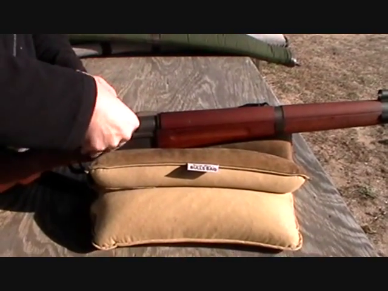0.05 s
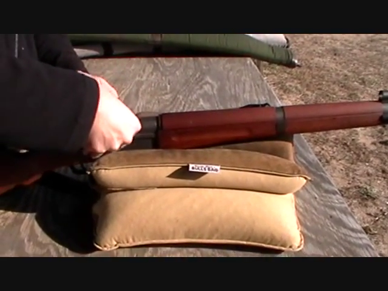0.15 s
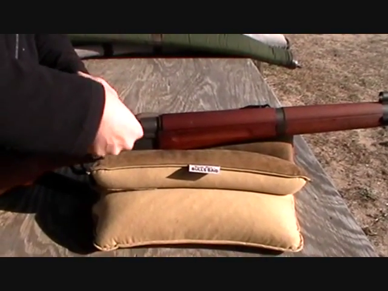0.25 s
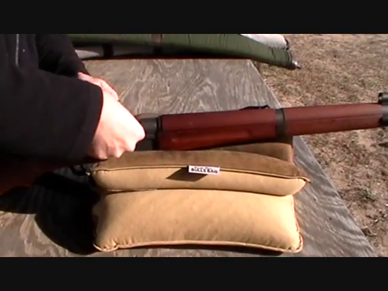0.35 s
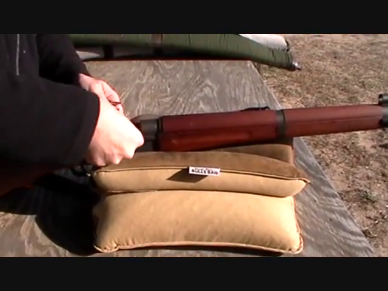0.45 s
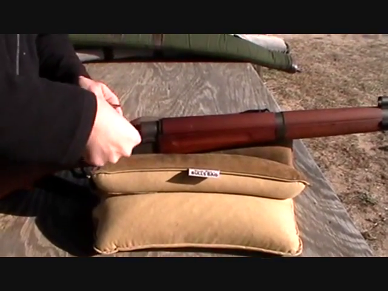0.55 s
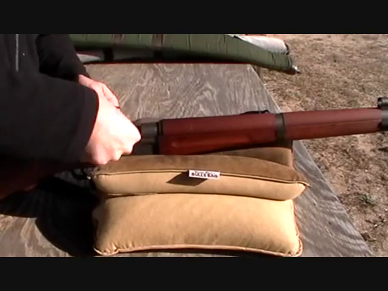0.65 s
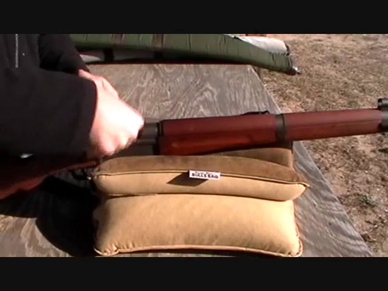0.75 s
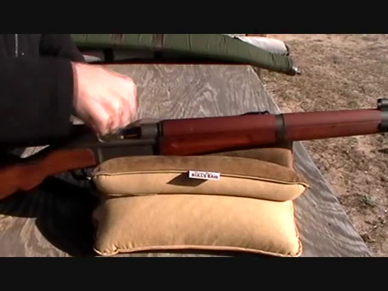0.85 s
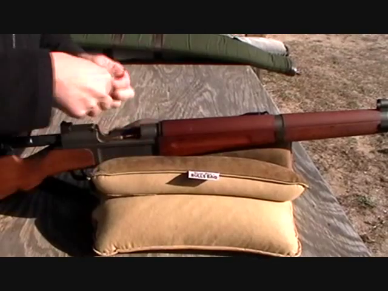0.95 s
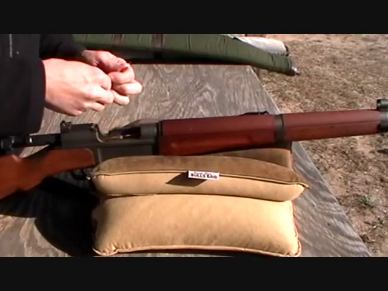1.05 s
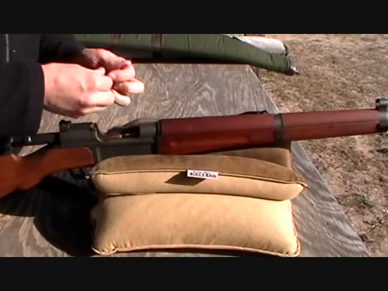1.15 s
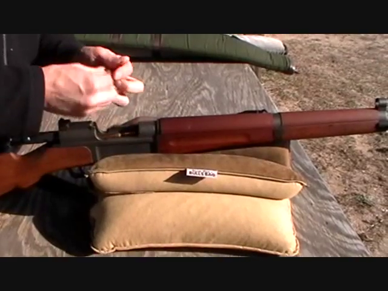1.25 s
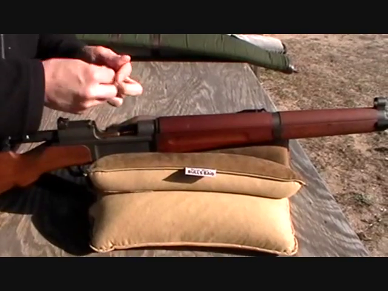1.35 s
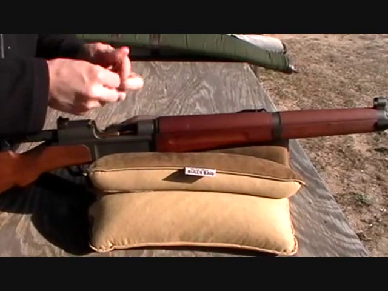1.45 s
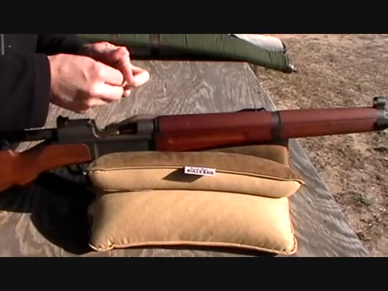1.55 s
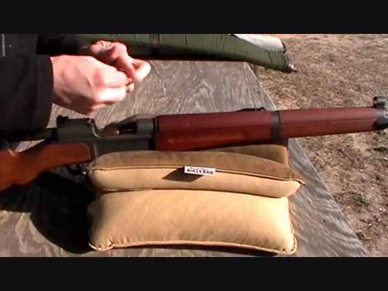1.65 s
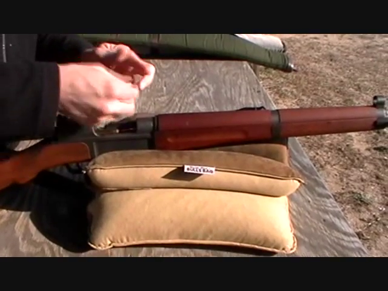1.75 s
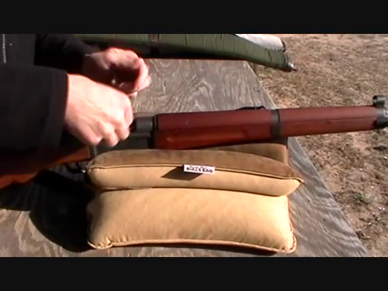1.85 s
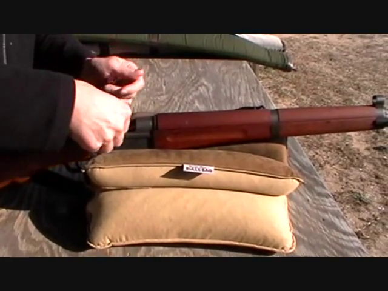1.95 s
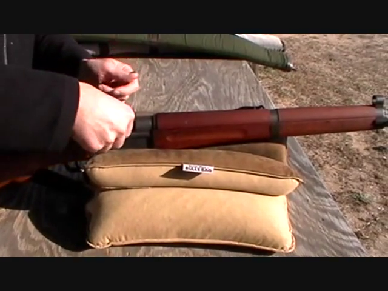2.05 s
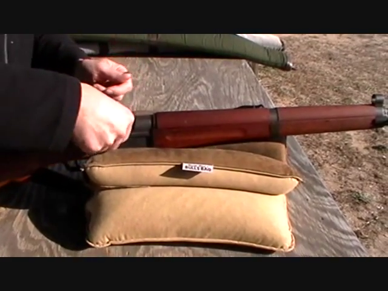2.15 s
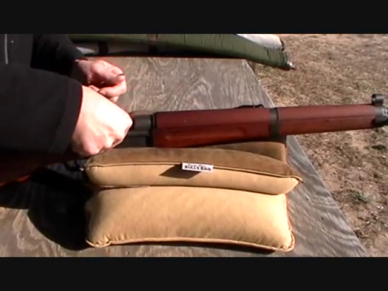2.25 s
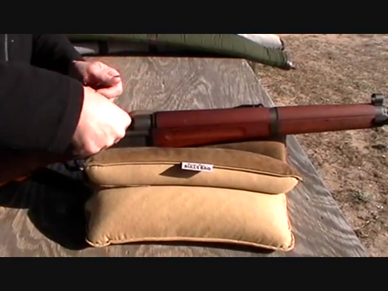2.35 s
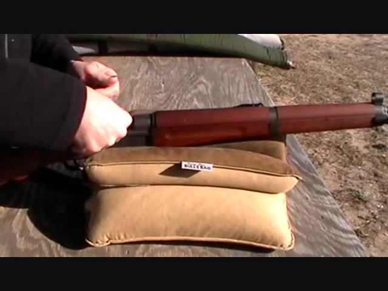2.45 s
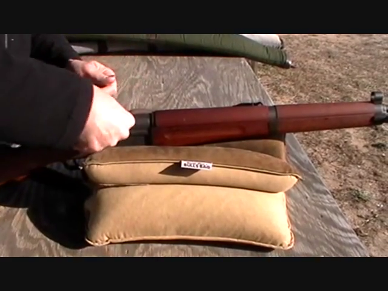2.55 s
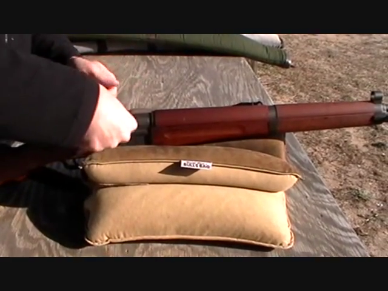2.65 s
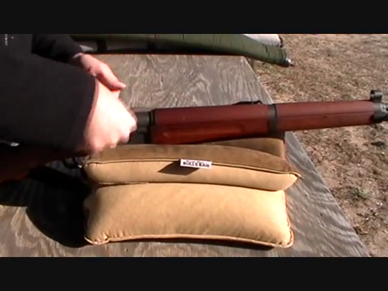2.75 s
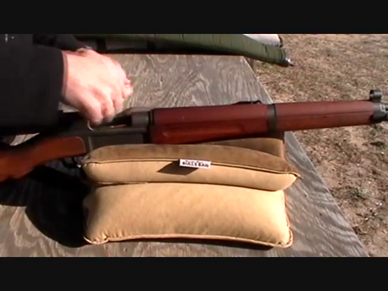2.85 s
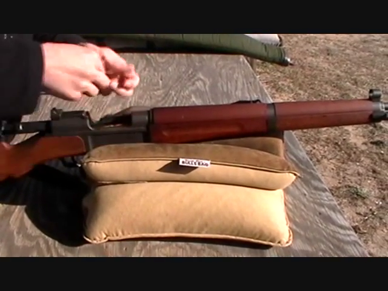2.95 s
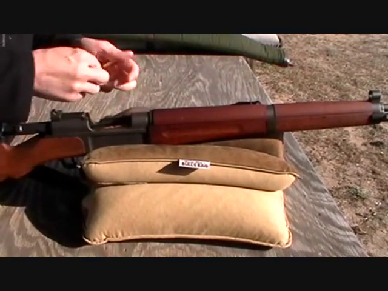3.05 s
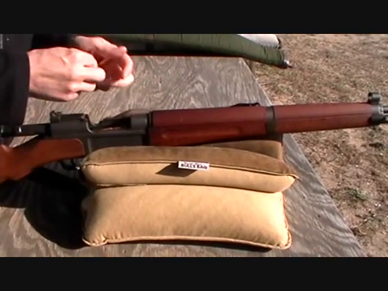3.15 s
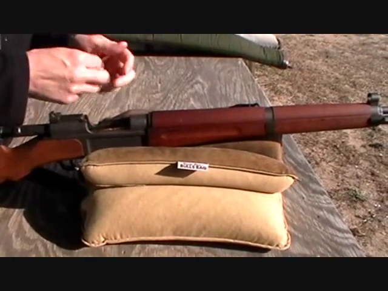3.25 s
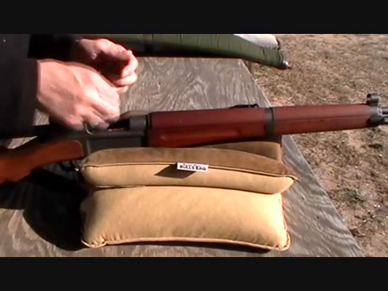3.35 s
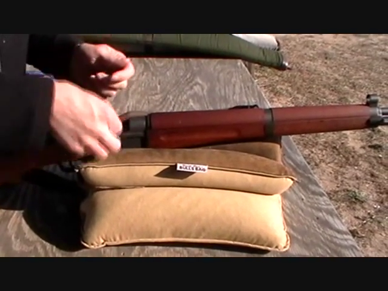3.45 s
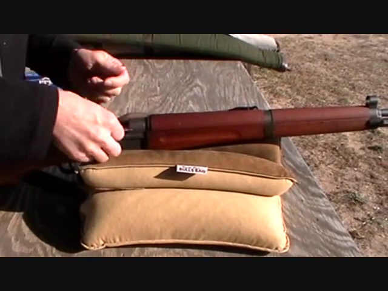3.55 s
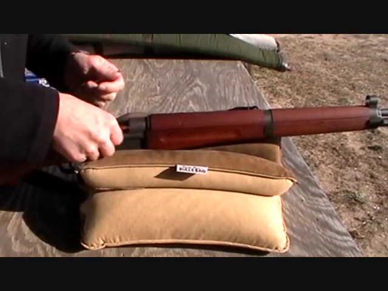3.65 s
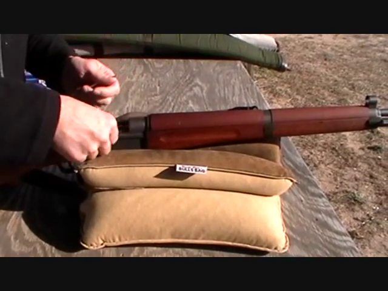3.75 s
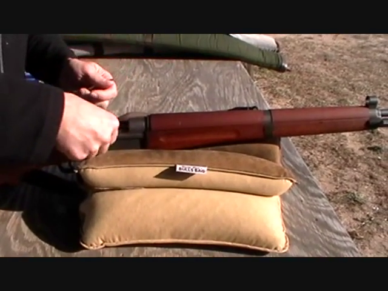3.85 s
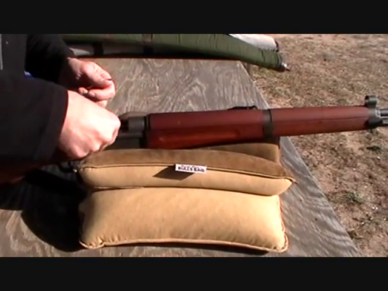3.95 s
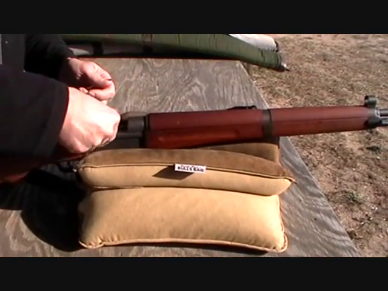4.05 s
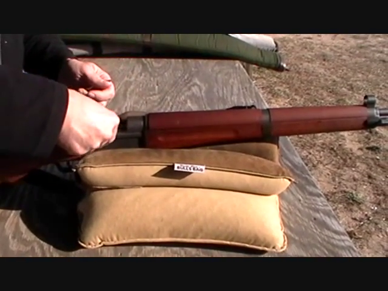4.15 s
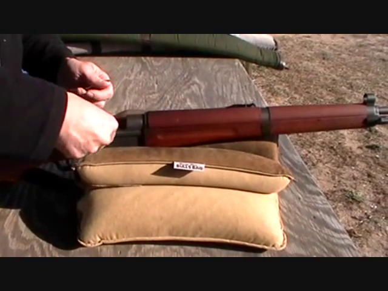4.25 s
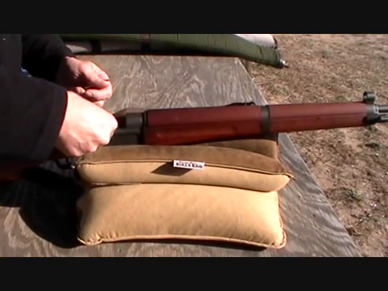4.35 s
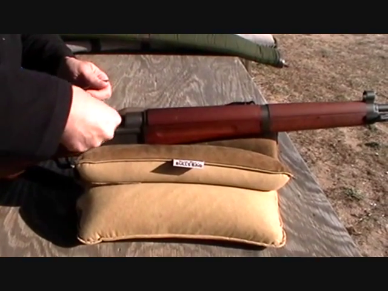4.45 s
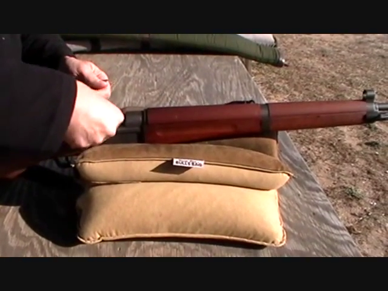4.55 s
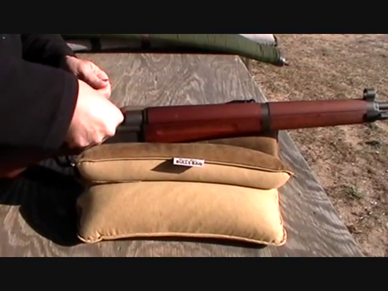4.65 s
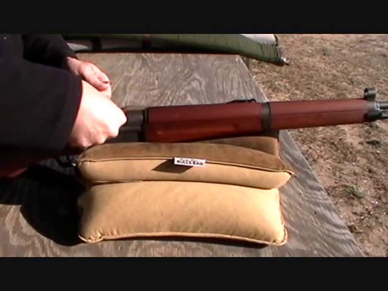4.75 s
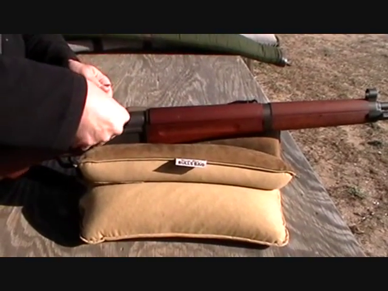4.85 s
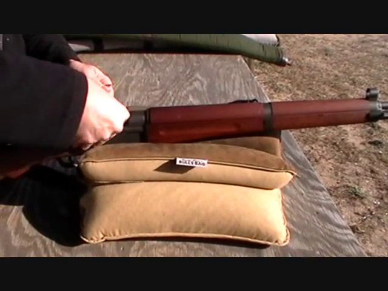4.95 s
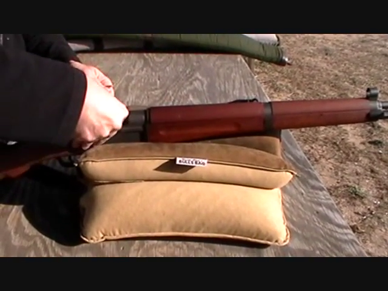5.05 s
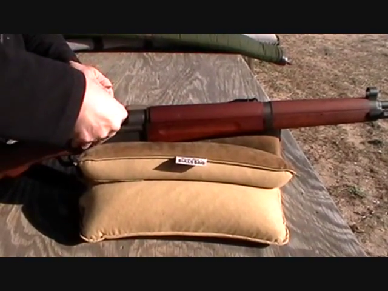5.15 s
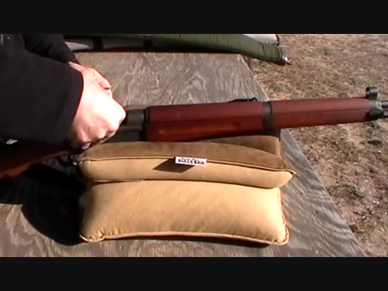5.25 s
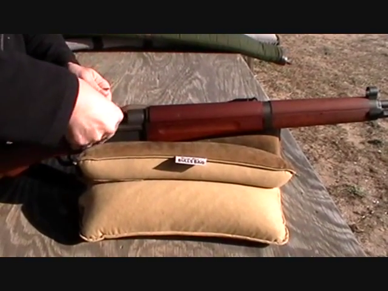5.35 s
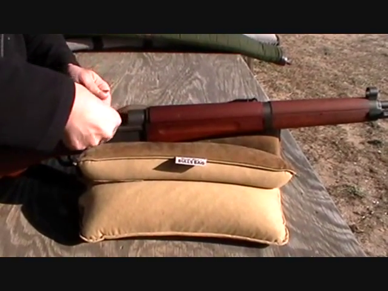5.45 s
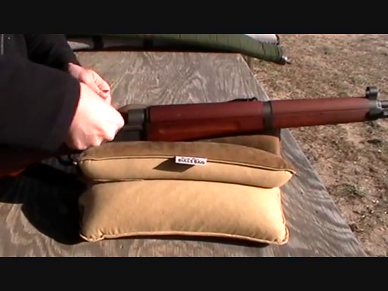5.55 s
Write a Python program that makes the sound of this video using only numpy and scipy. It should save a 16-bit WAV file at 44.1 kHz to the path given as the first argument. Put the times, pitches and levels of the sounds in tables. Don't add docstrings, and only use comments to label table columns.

```python
import sys
import numpy as np
from scipy import signal
from scipy.fft import rfft, irfft, next_fast_len
from scipy.io import wavfile
from scipy.ndimage import uniform_filter1d, map_coordinates

SR = 44100
rng = np.random.default_rng(int(sys.argv[2]) if len(sys.argv) > 2 else 0)


def convert_level_to_amplitude(level_db):
    exponent = np.asarray(level_db, float) / 20
    return 10 ** exponent


def pcm_store(signal):
    levels = np.round(np.clip(np.atleast_2d(signal), -1, 1) * 32767)
    wavfile.write(sys.argv[1], SR, levels.astype(np.int16).T)


N = 247401


def unit(x):
    return x / np.sqrt(np.mean(x ** 2) + 1e-20)


def along(points, hz):
    f, v = np.transpose(points)
    return np.interp(np.log(hz + 1), np.log(f + 1), v)


def wobble(rate):
    knots = rng.standard_normal(int(N * rate / SR) + 4)
    return map_coordinates(knots, [np.arange(N) * rate / SR])


def filtered(x, response):
    m = next_fast_len(N + SR // 2)
    return irfft(rfft(x, m) * response(np.fft.rfftfreq(m, 1 / SR)), m)[..., :N]


def body(modes):
    def response(f):
        total = 0
        for k, (centre, width, db) in enumerate(modes):
            resonance = 1j * f * width / (centre ** 2 - f ** 2 + 1j * f * width)
            total = total + (-1) ** k * convert_level_to_amplitude(db) * resonance
        return total / np.sqrt(np.mean(abs(total) ** 2))
    return response


def rush(spectrum, patchy_db):
    # f/Hz, likeness (1 = the same)
    alike = [(60, 0.92), (180, 0.93), (550, 0.85), (1650, 0.87), (4970, 0.13), (15000, 0.37)]
    z = signal.stft(rng.standard_normal((2, N + 512)), nperseg=512)[2]
    patches = uniform_filter1d(rng.standard_normal(z.shape[1:]), 3, 0)
    patches = uniform_filter1d(patches, 14, 1)
    pair = signal.istft(z * convert_level_to_amplitude(patchy_db * unit(patches)), nperseg=512)[1][:, :N]

    def response(hz):
        inside = (hz > spectrum[0][0]) * (hz < spectrum[-1][0])
        turn = np.arccos(np.clip(along(alike, hz), -1, 1)) / 2
        return convert_level_to_amplitude(along(spectrum, hz)) * inside * [np.cos(turn), np.sin(turn)]

    mid, side = filtered(pair, response)
    return unit(np.array([mid + side, mid - side]))


def outdoors():
    # t/s, level/dB
    traffic = [(0, -59), (.17, -56.5), (1.34, -56), (1.92, -53), (2.16, -50), (2.4, -50.5), (2.92, -49.5),
               (3.3, -52), (3.55, -51), (3.75, -47.5), (4.01, -50.5), (4.27, -51), (5.08, -51), (5.41, -50),
               (5.61, -45.5)]
    # f/Hz, level/dB per Hz
    rumble_colour = [(15, -50.5), (25, -26.5), (59, -7.5), (139, 1), (173, -6.5), (382, -7.5), (616, -13),
                     (650, -7.5), (840, -36.5), (1430, -120)]
    road_colour = [(380, -43), (650, -14.5), (747, -3), (869, -4.5), (1010, -4.5), (1200, -8), (1560, -37),
                   (2640, -120)]
    tyre_colour = [(760, -32.5), (1300, -3.5), (1550, -0.5), (1680, -2), (1840, -5.5), (1980, -10.5),
                   (2260, -8), (2670, -14), (3180, -31), (3600, -28.5), (4680, -56), (7920, -120)]
    hiss_colour = [(1500, -14), (3000, 8.5), (5000, -0.5), (8000, -6), (12000, -6), (15800, -13)]
    road_db = np.interp(np.arange(N) / SR, *np.transpose(traffic))
    swing_db = road_db - road_db.mean()
    rumble = convert_level_to_amplitude(-54 + 0.14 * swing_db + 0.8 * wobble(6)) * rush(rumble_colour, patchy_db=0.7)
    road = convert_level_to_amplitude(road_db + 0.46 * wobble(3.6)) * rush(road_colour, patchy_db=2.5)
    tyres = convert_level_to_amplitude(-52 + 0.28 * swing_db + 0.9 * wobble(1.8)) * rush(tyre_colour, patchy_db=1.5)
    hiss = convert_level_to_amplitude(-66) * rush(hiss_colour, patchy_db=1.1)
    return rumble + road + tyres + hiss


def fingers(grain_db=2, still_db=-73):
    # middle t/s, level/dB, time to fade 6 dB on each side/s
    strokes = [(.33, -63.5, 0.19), (.435, -58, 0.07), (.58, -63.5, 0.2), (.701, -55, 0.0238),
               (.86, -64, 0.1), (1, -66.5, 0.15), (1.13, -68, 0.17), (1.375, -64, .015), (1.445, -68, .04),
               (1.871, -66, .05), (2.24, -62.5, 0.1), (2.39, -61, 0.0066), (2.81, -62, 0.0154),
               (2.9, -65.5, .05), (3.32, -74, 0.13), (3.79, -57.5, 0.0387), (3.94, -62, 0.1033),
               (4.74, -64, 0.17), (5.38, -69, .15), (5.51, -50, .06), (3.73, -57, .06), (2.075, -50, .03),
               (.15, -44, .03), (4.33, -58, .05)]
    # f/Hz, level/dB per Hz
    cloth = [(1500, -25.5), (3000, -6), (5500, -3.5), (9000, -10), (13000, -19), (15800, -20)]
    t = np.arange(N) / SR
    swells_db = [np.maximum(db - 6 * abs(t - s) / fade_s, still_db) for s, db, fade_s in strokes]
    grains = unit(rng.standard_normal(N) * convert_level_to_amplitude(grain_db * wobble(400)))
    rub = unit(filtered(grains, lambda hz: convert_level_to_amplitude(along(cloth, hz))))
    return convert_level_to_amplitude(np.max(swells_db, axis=0)) * rub


def strikes(t, spiky_db=3, lose_db=11, chatter_db=-17, chatter_s=0.015, blow=10):
    # t/s, brass level/dB, receiver level/dB re brass, lips level/dB re brass
    thuds = [
        (0.065, -64.5, -6, 5),
        (1.9159, -61, -10, -4),
        (2.7426, -76, 4, -13.5),
        (2.8209, -46, 9, -0.5),
        (2.932, -68.5, -7.5, 10.5),
        (4.293, -39, 0, 0),
        (4.9474, -41, 6, -8),
        (4.9587, -70, 6.5, -9.5),
    ]
    springs = [(0.1165, -11, -5, -5), (0.118, -5, -8, -4), (0.1745, -39, -1.5, -4), (2.1343, -17, -8, -5),
               (2.4883, -20, -6, -8), (2.4992, -8, -2, -3), (2.5141, -9, -1, -2), (3.8548, -16, -4, -10),
               (3.8242, -25, -1, -20), (4.4626, -28, 0, -6), (5.4098, -10, -3, -4), (5.4298, -5.5, -1, -5)]
    snaps = [(2.123, -17, -2, -1), (3.6484, -23, -4, 0), (3.6562, -29, -6, -8), (3.8481, -22, -4, -10.5),
             (3.8589, -15, -3, -2), (4.2863, -19, 1, -9), (4.4712, -16, -7, 0), (4.4726, -17, -7, 1),
             (4.4738, -17, -7, 0), (4.4752, -17, -6, -2), (4.4842, -11.5, -8, -5), (4.4858, -14, -8, 0),
             (4.4884, -15, 0, -3), (4.4897, -11, -4, 0), (4.4935, -19, -2, -6), (4.5212, -30, -3, -6),
             (4.5349, -28, 0, -14), (2.5167, -13, -2, -2), (2.52, -17, 2, -6), (2.5235, -20, -2, -5),
             (2.53, -23, 0, -5), (2.534, -24, 0, -5), (3.8415, -33, -4, -3), (3.8569, -19, -2, -10),
             (3.8645, -20, 0, -8), (0.1213, -18, -3, -4), (0.1243, -16, -3, -5), (4.9499, -38, -8, -12),
             (5.4268, -13, 0, 0), (5.437, -22, -2, 0), (5.4435, -24, -2, 0), (5.449, -25, -2, 0),
             (5.465, -33, 0, -4), (5.488, -39, 0, -4), (.8605, -40, 0, 0), (.866, -42, 0, 0),
             (3.6115, -31, 0, 0), (3.622, -37, 0, 0), (5.4334, -15, 0, 1.5), (5.5095, -45, 2, -3)]
    rattles = [
        (0.1232, -20, 0, -3),
        (0.22, -50, 2, -3),
        (0.1329, -30, -6.5, 3),
        (1.5438, -34.5, 1.5, 2),
        (1.5443, -46, -12, -7),
        (3.6684, -39.5, -1.5, -9),
        (3.6893, -44.5, -3, -17),
        (4.5328, -36, -0.5, -6),
        (4.6124, -38, -5, -14),
        (5.4228, -23, 2.5, 4.5),
    ]
    ticks = [(0.32, -57.5, 2.5, -4), (0.3453, -66, 16.5, -0.5), (0.5393, -50, 0, 3), (2.3004, -61, 1, 7.5),
             (2.3968, -53.5, 3.2, 1), (2.8169, -53.5, 8.5, -9), (3.9491, -47.5, 8, -4),
             (4.2201, -45, 5, -12), (4.2352, -41, 5, -15), (4.2749, -56, 8, -22), (4.7352, -65, 15, -7),
             (4.8913, -48.5, 3.2, -27.5), (5.1911, -59, 16.74, -14)]
    clinks = [(0.7995, -54, -1, -28), (0.8056, -49.5, -5.5, -13), (0.9426, -47, -5.5, 1.5),
              (1.0014, -57, -15, -3), (1.1276, -58.5, -8, -1.5), (1.2605, -51, -14.5, -18.5),
              (1.3374, -54, -20.5, -6.5), (1.43, -48, -6, -3), (1.4451, -44, -24, -16),
              (1.6526, -29, -12, -1), (1.6575, -34, -12, 4.5), (1.6633, -40, -26, -9.5),
              (1.8603, -57.5, -4.5, -1.5), (1.8723, -59.5, -18.5, 0), (3.2063, -49.5, -9, -21.5),
              (3.2245, -62, -7, -1), (3.2449, -63, -13.5, -5), (3.368, -46.5, -30, -1.5),
              (3.3834, -70, -15.5, -5), (3.7647, -45, -12.5, -16.5), (3.7771, -50, -8, -11),
              (3.8031, -48, -25.5, -19)]
    knocks = [
        (0.851, -24, 0, -2),
        (2.0255, -30, 3, -16),
        (2.0483, -24, 3, -8),
        (2.0891, -40.5, 3, -8),
        (2.1316, -20, -1, -5),
        (2.1385, -25.5, 1.5, -5),
        (3.6062, -24, 0, 3),
        (3.6152, -34, 4, 1),
        (4.6187, -37.5, 4.5, -26),
        (5.4272, -20, 0, 2),
    ]
    # contacts, stock level/dB re brass, rattle length/ms
    kinds = [(springs, -16, 2.1), (snaps, -5.5, 1.8), (knocks, 0.6, 2.6), (thuds, 10.5, 2.4),
             (rattles, -3.4, 4.8), (clinks, -17.5, 1.7), (ticks, -0.6, 2.4)]
    force = np.zeros((4, N + len(t)))
    spike_db = spiky_db * np.repeat(rng.standard_normal(N // 10 + len(t)), 10)[:N + len(t)]
    grit = rng.standard_normal(N + len(t)) * convert_level_to_amplitude(spike_db)
    for rows, stock_db, ms in kinds:
        fade = convert_level_to_amplitude(-lose_db * t / (ms / 1000)) + convert_level_to_amplitude(chatter_db - 60 * t / chatter_s)
        for s, db, receiver_db, lips_db in rows:
            start = round(s * SR)
            rattle = np.append(blow, grit[start * 37 % N:][:len(t) - 1]) * fade
            rattle *= np.linalg.norm(fade) / np.linalg.norm(rattle)
            levels_db = db + np.array([0, receiver_db, lips_db, stock_db])
            force[:, start:][:, :len(t)] += convert_level_to_amplitude(levels_db)[:, None] * rattle
    return force


def slides(t):
    # start t/s, end t/s, start level/dB, end level/dB, stock level/dB re scrape
    drags = [
        (0.095, 0.121, -46, -28, 2.5),
        (2.459, 2.489, -63, -38.5, -2),
        (2.485, 2.515, -34, -36, -2),
        (3.842, 3.848, -41, -42, -9.5),
        (4.213, 4.24, -62, -47.5, 8.5),
        (4.4685, 4.486, -30, -27, -4),
        (5.385, 5.411, -70, -35, 9),
        (5.415, 5.427, -20.5, -27, -4.5),
    ]
    force = np.zeros((4, N + len(t)))
    for start, end, start_db, end_db, stock_db in drags:
        level_db = np.interp(t, [0, end - start], [start_db, end_db])
        scrape = rng.standard_normal(len(t)) * convert_level_to_amplitude(level_db) * (t < end - start)
        force[:, round(start * SR):][:, :len(t)] += convert_level_to_amplitude([[-2.5], [0.5], [-5], [stock_db]]) * scrape
    return force


def contacts(dull_hz=11100):
    # f/Hz, width/Hz, level/dB
    brass_modes = [(4850, 250, -4), (5280, 150, 0), (5900, 350, -4), (6550, 260, -2), (7100, 400, -7)]
    receiver_modes = [(2850, 300, -5), (3280, 220, -2), (3700, 300, -6), (4350, 250, -6)]
    lip_modes = [(7540, 500, 3), (8904, 580, 0.5), (9800, 600, -0.5), (10830, 470, 1.5), (11900, 1200, -8),
                 (14300, 2600, -15)]
    stock_modes = [(419.2, 42, -16.5), (810.2, 67, -3), (1285, 330, -6.5), (1470, 225, -1), (1735, 300, -2),
                   (2360, 310, -4.5)]
    t = np.arange(SR // 20) / SR
    force = (strikes(t) + slides(t))[:, :N]
    brass = convert_level_to_amplitude(1.2) * filtered(force[0], body(brass_modes))
    receiver = convert_level_to_amplitude(0.5) * filtered(force[1], body(receiver_modes))
    lips = convert_level_to_amplitude(0.3) * filtered(force[2], body(lip_modes))
    stock = convert_level_to_amplitude(0.5) * filtered(force[3], body(stock_modes))

    def dull(hz):
        return 1 / (1 + 1j * hz / dull_hz / 0.7 - (hz / dull_hz) ** 2)

    return lips + filtered(brass + receiver + stock, dull)


def rings(waver=0.6, flutter_db=4, twin_ratio=1.022, twin_db=-6):
    pitch = dict(butt=420, stock=812, palm=2430, bolt=3290, body=5260, case=5400, spring=7800, throat=2880, ramp=4050, rim=6620, bag=330, grip=1650, edge=12500, wall=4950, rail=7250, neck=9950, lip=10950)
    # t/s, mode name, level/dB, time to fall 60 dB/s
    pings = [(2.0256, "wall", -24, .015), (2.0256, "throat", -22, .012), (2.0256, "rail", -36, .01),
             (2.0484, "wall", -18, .03), (2.0484, "rail", -19, .012), (2.0484, "neck", -31, .012),
             (2.058, "wall", -38, .06), (2.0484, "palm", -27, .03), (2.058, "palm", -38, .06),
             (.118, "wall", -14, .02), (.135, "wall", -27, .09), (.8513, "bolt", -19, .01),
             (3.6486, "grip", -25, .03), (3.6486, "ramp", -25, .012), (3.8243, "grip", -25, .02),
             (3.8243, "throat", -23, .012), (3.735, "body", -52, .2), (2.0257, "grip", -26, .015),
             (4.535, "grip", -25, .03), (4.535, "stock", -32, .04), (4.2864, "neck", -33, .01),
             (.124, "ramp", -19, .02), (.1, "throat", -34, .08), (2.1232, "spring", -14, .012),
             (2.1234, "rail", -14, .012), (2.1234, "ramp", -20, .015), (2.1232, "neck", -21, .012),
             (2.134, "wall", -19, .03), (2.4884, "bolt", -17, .015), (2.4884, "rim", -19, .012),
             (2.4884, "lip", -24, .01), (3.6486, "spring", -24, .02), (3.6486, "neck", -22, .012),
             (3.8591, "neck", -16, .015), (3.8591, "spring", -18, .012), (4.2864, "lip", -20, .012),
             (4.2864, "rim", -20, .012), (4.2864, "throat", -11, .014), (4.2866, "grip", -22, .015),
             (4.2866, "palm", -22, .012), (4.2866, "rail", -22, .012), (4.289, "ramp", -26, .04),
             (4.301, "neck", -52, .04), (.8512, "lip", -32, .01), (.8512, "rim", -30, .01),
             (.118, "neck", -15, .012), (.118, "palm", -14, .015)]
    brass_rings = [(0.54, "body", -43.5, .03), (0.8053, "case", -52, .07), (1.5429, "case", -32.5, 0.052),
                   (1.55, "case", -59, .2), (1.544, "neck", -32.5, 0.039), (1.6527, "neck", -32, 0.03),
                   (1.6577, "neck", -33, 0.04), (1.6581, "neck", -55, 0.22), (1.6578, "case", -32, 0.0335),
                   (1.6643, "case", -36, 0.022), (1.6563, "palm", -38.5, 0.076), (2.82, "body", -44, 0.03),
                   (3.368, "body", -32, 0.0111), (3.378, "body", -65, 0.07), (3.6486, "body", -13, 0.025),
                   (3.6487, "body", -32, 0.18), (3.8043, "body", -56, 0.082), (3.8242, "body", -11, 0.018),
                   (3.834, "body", -30.5, 0.16), (3.8548, "body", -9, 0.025), (3.859, "body", -13, 0.055),
                   (4.6103, "case", -32, .04), (4.891, "body", -55, 0.068), (.118, "body", -12, .03),
                   (.1182, "rim", -9, .015), (.17, "body", -35, .04), (2.5005, "case", -22, .03),
                   (3.8548, "rim", -11, .012), (3.848, "body", -20, .03), (4.4842, "rim", -14, .015),
                   (4.489, "rim", -13, .02), (4.5, "rim", -24, .02), (4.535, "case", -28, .04),
                   (5.4098, "rim", -11, .015), (5.41, "lip", -18, .02), (5.4285, "rim", -9, .02)]
    rifle_rings = [(.851, "throat", -30, .01), (.851, "stock", -29, .04), (.1165, "bag", -27, .025),
                   (.1165, "stock", -24, .04), (.13, "bag", -41, .1), (.124, "throat", -17, .02),
                   (.13, "throat", -30, .08), (2.4992, "bag", -35, .05), (2.5141, "bag", -38, .08),
                   (3.8548, "bag", -35, .02), (4.2864, "bag", -40, .06), (4.4842, "bag", -29, .02),
                   (3.8548, "grip", -16, .02), (2.123, "grip", -15, .025), (3.606, "grip", -25, .04),
                   (.117, "grip", -18, .015), (3.825, "stock", -32, .12), (2.4992, "edge", -27, .012),
                   (2.5141, "edge", -21, .02), (4.4712, "edge", -24, .03), (4.485, "edge", -27, .03),
                   (.117, "edge", -19, .015), (3.606, "edge", -33, .03), (5.4098, "bolt", -9, .015),
                   (4.9478, "stock", -30, .03), (4.236, "bolt", -36, .015), (4.2205, "bolt", -38, .012),
                   (3.863, "bolt", -19, .04), (.104, "stock", -29.5, .15), (2.135, "butt", -42, 0.18),
                  (2.495, "stock", -30, 0.14), (2.4992, "lip", -12, .025), (2.4996, "bolt", -12, 0.022),
                  (2.512, "stock", -26, .08), (3.655, "spring", -40, 0.08), (3.65, "stock", -33, 0.225),
                  (3.655, "butt", -44, 0.17), (3.86, "butt", -38, 0.17), (4.2201, "stock", -34, 0.17),
                  (4.2864, "stock", -26, 0.07), (4.2862, "bolt", -12, 0.014), (4.473, "stock", -26, 0.14),
                  (4.535, "bolt", -20, 0.03), (4.9474, "bolt", -17, 0.009), (4.9499, "rim", -33, .012),
                  (4.958, "palm", -46, .03), (.117, "throat", -9, .015), (.123, "bolt", -20, .025),
                  (.118, "ramp", -21, .04), (.22, "ramp", -48, .03), (.32, "bolt", -50, .02),
                  (4.4712, "spring", -13, .02), (4.486, "spring", -13, .012), (4.4935, "bolt", -22, .06),
                  (5.4275, "throat", -12, .02), (5.4285, "lip", -14, .025), (2.489, "throat", -22, .015),
                  (3.855, "throat", -13, .02), (5.401, "stock", -29.5, .15), (5.42, "stock", -28.5, 0.071)]
    out = np.zeros(N + SR)
    drift = np.pad(waver * wobble(260), (0, SR))
    flutter = np.pad(flutter_db * wobble(220), (0, SR))
    for s, mode, db, t60 in pings + brass_rings + rifle_rings:
        hz = pitch[mode]
        t = np.arange(round(t60 * SR)) / SR
        at = slice(round(s * SR), round(s * SR) + len(t))
        smear = drift[at] * min(1, hz / 5000)
        tone = np.sin(2 * np.pi * hz * t + smear)
        if hz > 2000:
            tone += convert_level_to_amplitude(twin_db) * np.sin(2 * np.pi * hz * twin_ratio * t - smear)
        level_db = db - 60 * t / t60 + flutter[at] * np.minimum(1, t / 0.012)
        out[at] += convert_level_to_amplitude(level_db) * tone * (1 - np.exp(-t / 0.0002))
    return out[:N]


def frame(vary_db=3, detune=0.01):
    # f/Hz, level/dB, time to fall 60 dB/s
    long_parts = [(2616, -8, 0.37), (3122, -1, 0.19), (4000, -2, 0.24), (5152, 0, 0.18), (5572, -2, 0.22),
                  (5949, -11, 0.25), (6465, -11, 0.23), (7332, -12, 0.38), (7515, -6, 0.22),
                  (7736, -6, 0.24), (8839, 0, 0.16), (10290, -13, 0.27)]
    # t/s, level/dB
    jolts = [
        (.12, -39),
        (2.13, -52),
        (2.515, -44),
        (3.86, -50),
        (4.49, -45),
        (5.43, -38),
    ]
    out = np.zeros(N + SR)
    t = np.arange(SR // 3) / SR
    hz, level_db, t60 = np.transpose(long_parts)[:, :, None]
    for s, db in jolts:
        louder, sharper, phase = rng.standard_normal((3, len(long_parts), 1))
        fade = convert_level_to_amplitude(db + level_db + vary_db * louder - 60 * t / t60)
        tones = np.sin(2 * np.pi * hz * (1 + detune * sharper) * t + 3 * phase)
        out[round(s * SR):][:len(t)] += np.sum(fade * tones, axis=0) * (1 - np.exp(-t / 0.003))
    return out[:N]


def thumps(soft_s=0.012):
    # t/s, level/dB
    pushes = [
        (0.127, -9),
        (2.137, -7),
        (2.5, -10),
        (3.661, -12),
        (3.863, -15.5),
        (4.493, 4),
        (5.434, 0),
    ]
    # f/Hz, width/Hz, level/dB
    bench_modes = [(100.16, 26, 3.5), (260, 110, -4)]
    push = np.zeros(N)
    for s, db in pushes:
        push[round(s * SR)] = convert_level_to_amplitude(db)
    bench = body(bench_modes)
    return filtered(push, lambda hz: bench(hz) * hz / 100 / (1 + 1j * hz * soft_s) ** 2)


def shelter(x, far_t60=0.48, own=0.35):
    # f/Hz, time to fall 60 dB/s, near level/dB, far level/dB
    answer = [(300, .1, -11, -34.5), (1500, 0.15, -11.5, -28.5), (2970, 0.16, -9.5, -26.5),
              (4499, 0.17, -10, -28), (6500, 0.15, -13.5, -32.5), (8550, 0.16, -15.5, -36),
              (11000, 0.15, -15.5, -41), (13500, .14, -14, -50), (15500, .1, -22, -60)]
    frames = dict(fs=SR, nperseg=256, noverlap=192)
    step, wait = 64 / SR, 3
    hz, _, z = signal.stft(x, **frames)
    energy = uniform_filter1d(np.abs(z) ** 2, size=2, axis=0)
    t60, near_db, far_db = (along([(row[0], row[k]) for row in answer], hz) for k in range(1, 4))

    def linger(e, fall_s):
        return signal.lfilter([0] * wait + [step / 0.01], [1, -convert_level_to_amplitude(-120 * step / fall_s)], e)

    near = np.array([linger(e, fall_s) for e, fall_s in zip(energy, t60)])
    far = linger(energy, far_t60)
    held = convert_level_to_amplitude(2 * near_db)[:, None] * near + convert_level_to_amplitude(2 * far_db)[:, None] * far
    noise = signal.stft(rng.standard_normal((3, N)), **frames)[2]
    common, *apart = signal.istft(13 * noise * np.sqrt(held), **frames)[1][:, :N]
    return common + own * np.array(apart)


def ports(x, scatter_db=-15.5, scatter_s=0.0036, bright_hz=9000):
    # f/Hz, left minus right/dB
    shadow = [(300, -4), (1000, -0.54), (2000, .5), (3000, 3.5), (4500, 3), (6000, -.5), (8000, -2),
              (10500, -4), (13000, -5), (15500, -2.5)]
    t = np.arange(SR // 100) / SR
    glance = rng.standard_normal(len(t)) * convert_level_to_amplitude(-60 * t / scatter_s)
    scattered = signal.fftconvolve(x, glance / np.linalg.norm(glance))[:N]
    side = filtered(scattered, lambda hz: 1 + (hz / bright_hz) ** 2)
    shaded = filtered(x, lambda hz: convert_level_to_amplitude(along(shadow, hz) / 2 * np.array([[1], [-1]])))
    return shaded + convert_level_to_amplitude(scatter_db) * side * [[1], [-1]]


def scene():
    hits, sung = contacts(), rings()
    close = ports(hits + sung + frame() + fingers())
    return close + shelter(hits + convert_level_to_amplitude(-5) * sung) + thumps() + outdoors()


def band_limit(x):
    return signal.sosfilt(signal.butter(12, 16310, fs=SR, output="sos"), x)


def record(dry):
    clipped = dry / (1 + np.abs(dry) ** 8) ** (1 / 8)
    mix = filtered(clipped, lambda hz: np.clip((16600 - hz) / 400, 0, 1))
    return band_limit(mix)


dry = scene()
out = record(dry)
pcm_store(out)
```